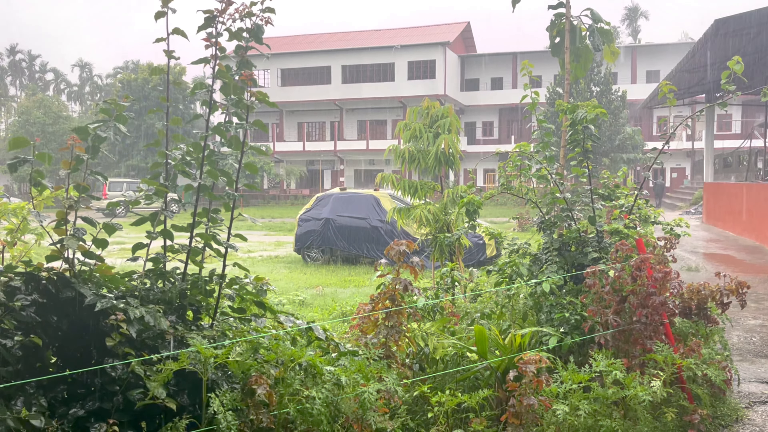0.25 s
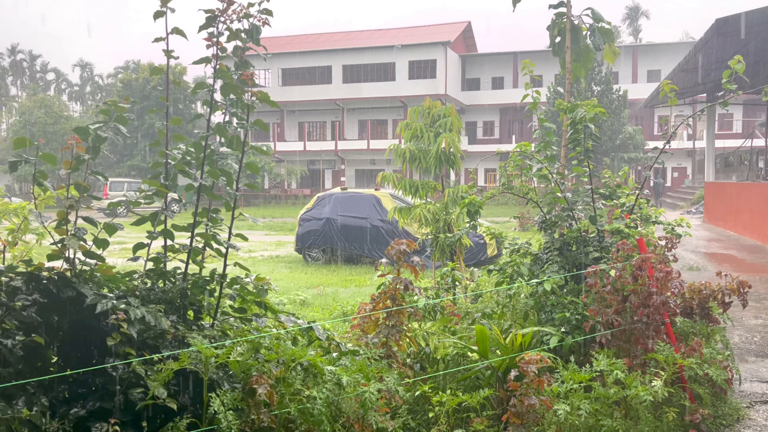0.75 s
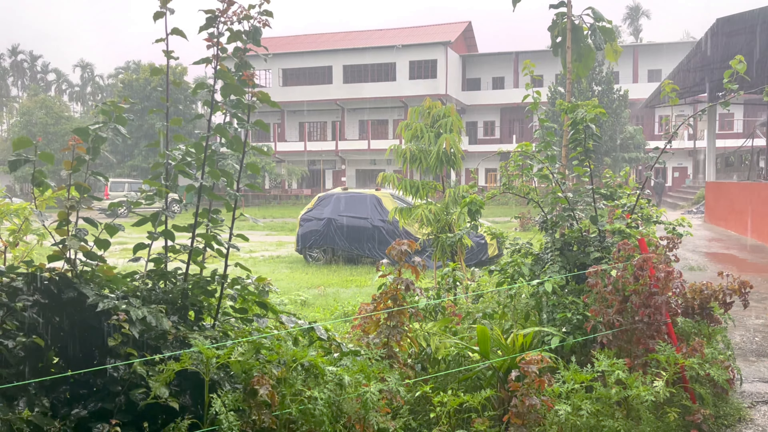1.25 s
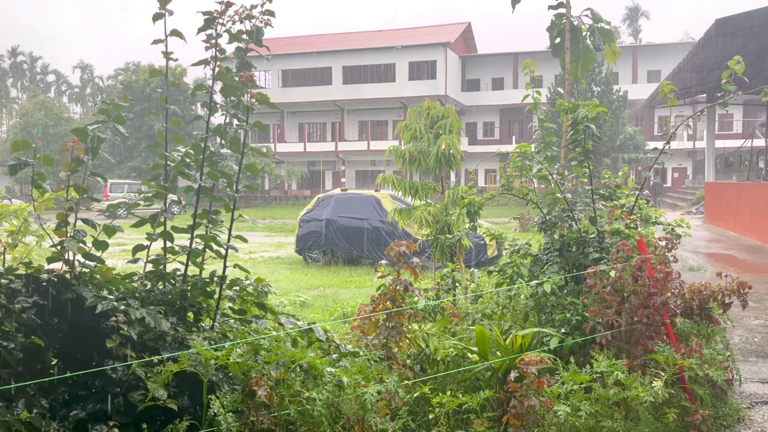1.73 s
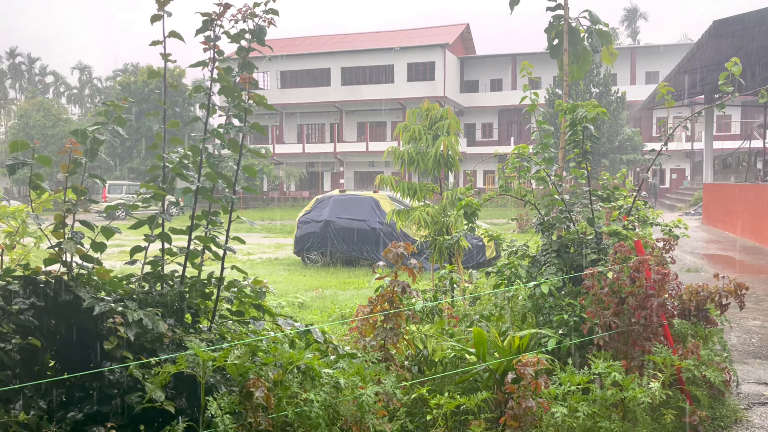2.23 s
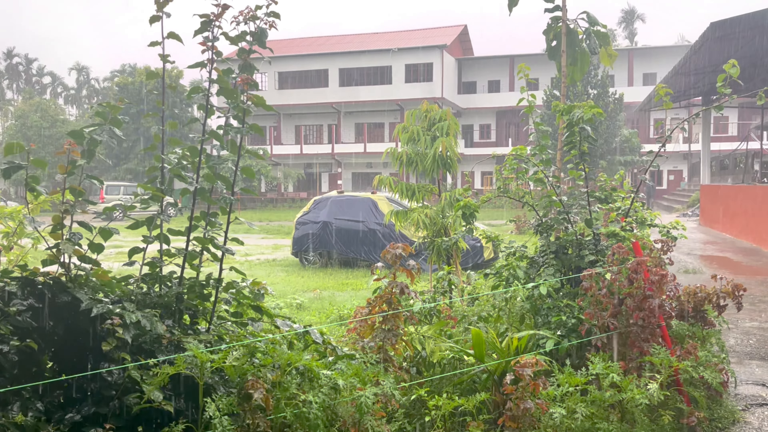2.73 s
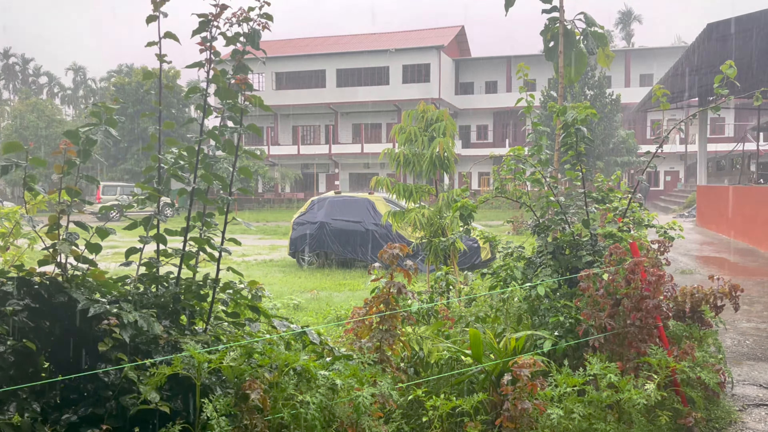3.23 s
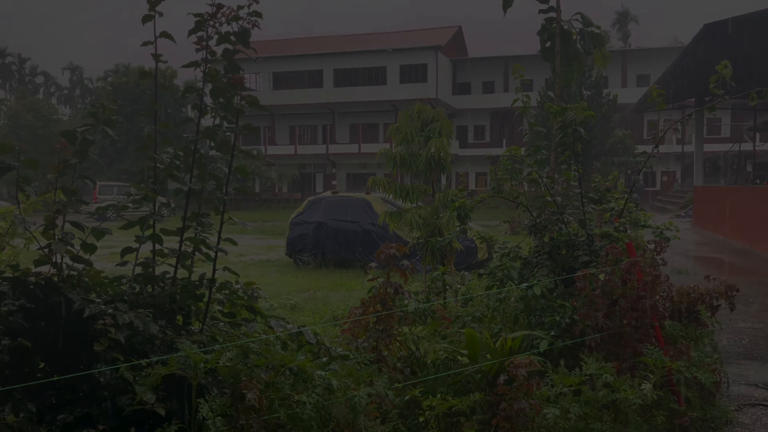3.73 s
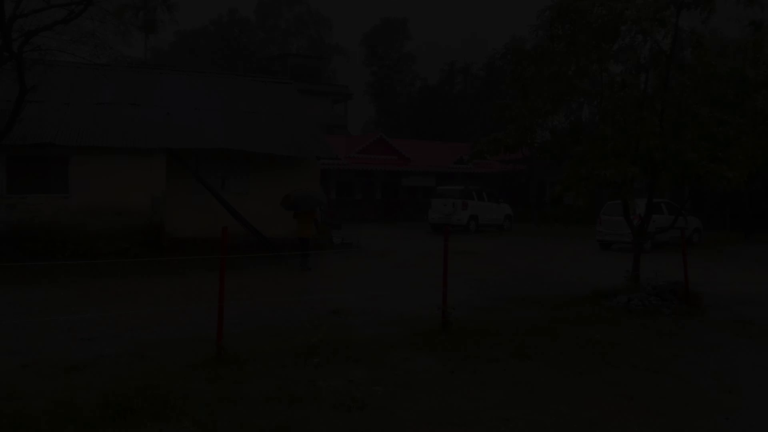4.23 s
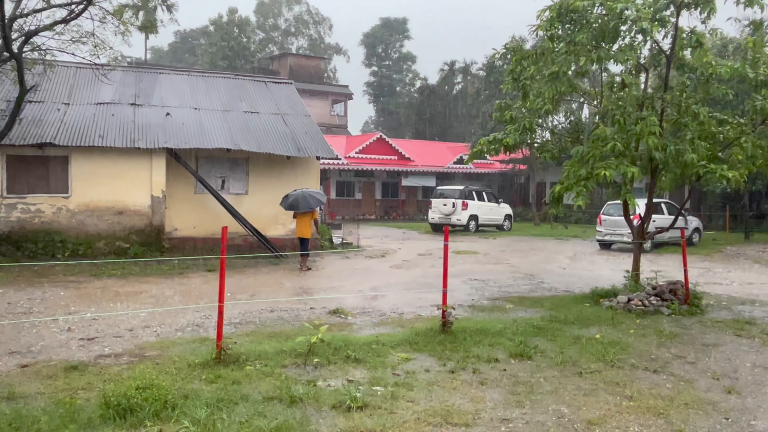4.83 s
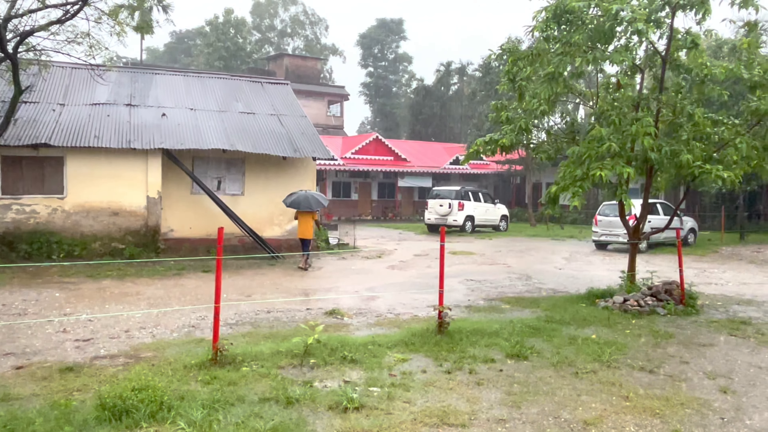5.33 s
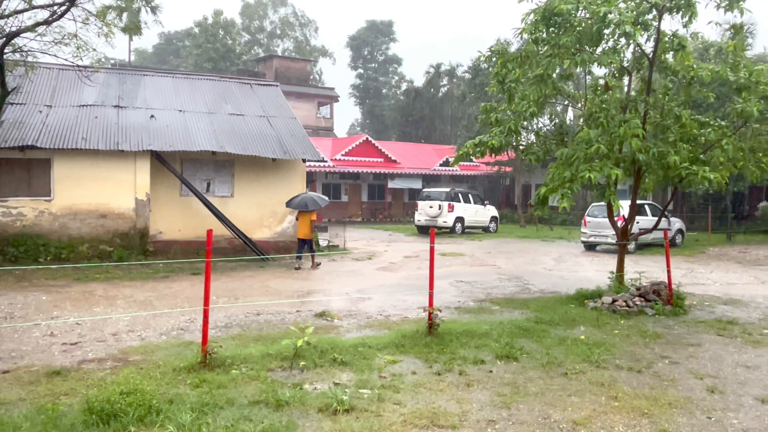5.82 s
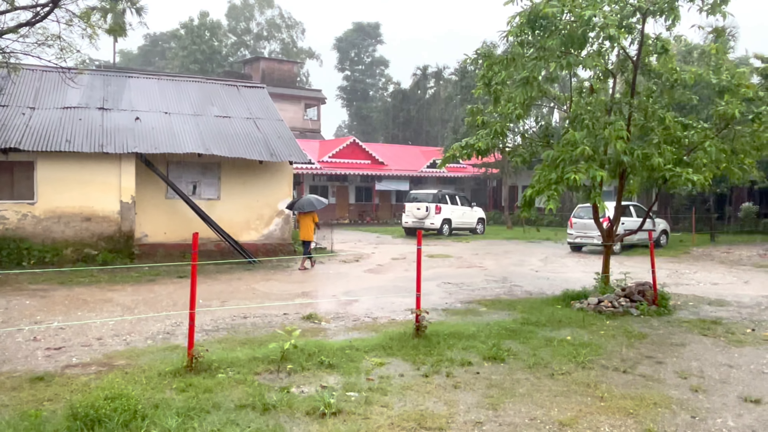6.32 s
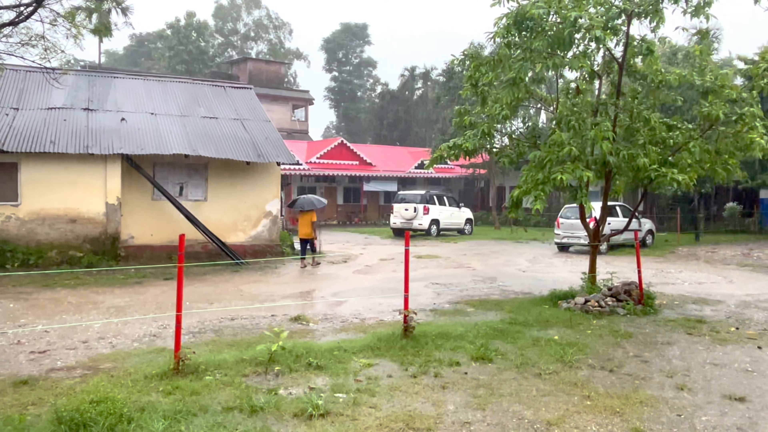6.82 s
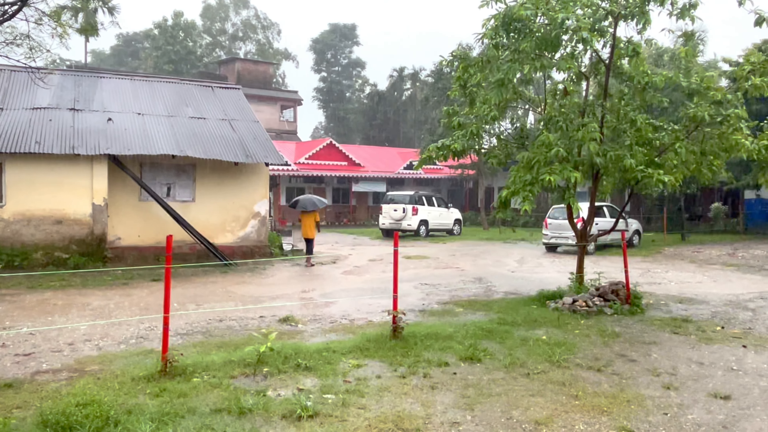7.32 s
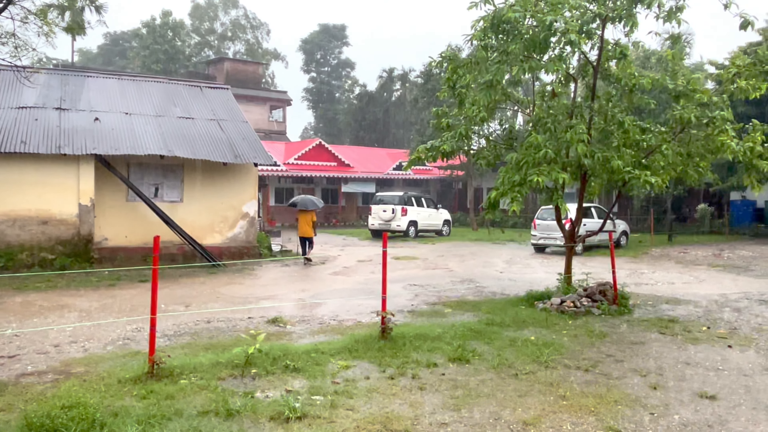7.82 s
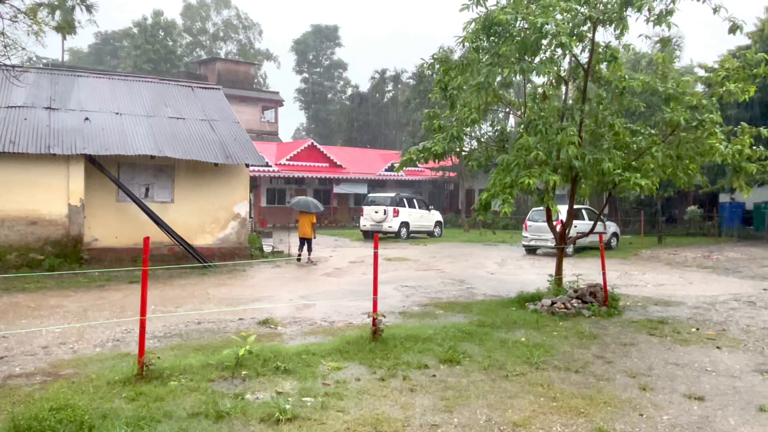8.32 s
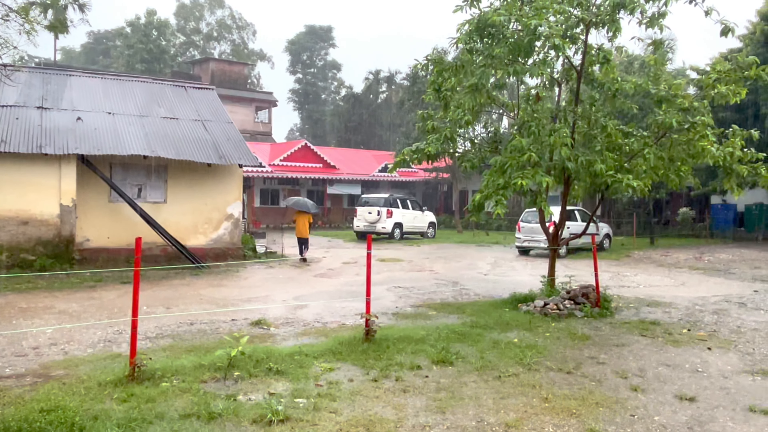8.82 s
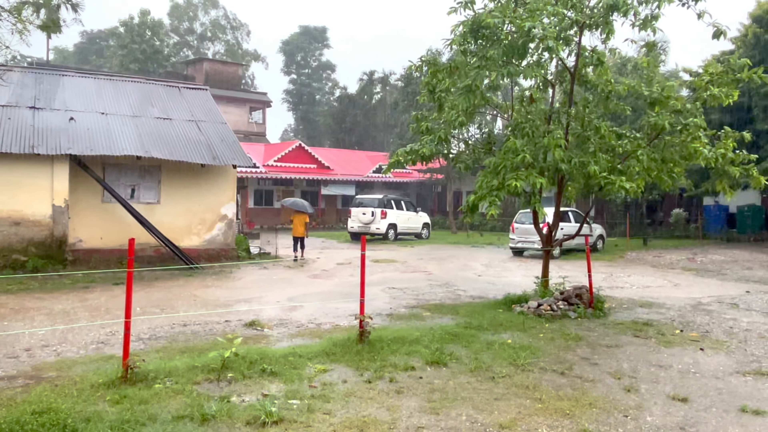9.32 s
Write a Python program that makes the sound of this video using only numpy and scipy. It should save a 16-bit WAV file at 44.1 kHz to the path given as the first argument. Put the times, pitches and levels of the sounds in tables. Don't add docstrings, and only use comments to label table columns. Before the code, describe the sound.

Heavy monsoon rain hisses on leaves with sharp ticks, fades to silence, then abruptly returns as fuller rain with puddle splats and overhead thuds.

```python
import sys
import numpy as np
from scipy import signal
from scipy.fft import rfft, irfft, next_fast_len
from scipy.io import wavfile
from scipy.ndimage import uniform_filter1d

SR = 44100
rng = np.random.default_rng(int(sys.argv[2]) if len(sys.argv) > 2 else 0)


def transcribe(u):
    v = np.clip(np.atleast_2d(u).T, -1, 1)
    q = np.round(v * 32767).astype(np.int16)
    wavfile.write(sys.argv[1], SR, q)


def makeup_ratio(level_db):
    decades = np.asarray(level_db, float) / 20
    return 10 ** decades


N = 421584
CUT_S, FADE_S = 5.1213, 1.99
PORT_DELAY_S = 0.0001723


def evened(x):
    return x / np.sqrt(np.mean(x ** 2) + 1e-20)


def read(points, hz):
    f, value = np.transpose(points)
    return np.interp(np.log(hz + 1), np.log(f + 1), value)


def smooth_noise(shape, sizes):
    noise = rng.standard_normal(shape)
    for size, axis in sizes:
        noise = uniform_filter1d(noise, size=size, axis=axis)
    return evened(noise)


def wash(n, patchy_db, gust_db, flicker_db):
    frames = n // 64 + 8
    real, imag = rng.standard_normal((2, 3, frames, 129))
    patches = smooth_noise((frames, 129), [(40, 0), (4, 1)])
    gusts = smooth_noise(frames, [(50, 0), (30, 0)])
    flicker = smooth_noise((frames, 129), [(5, 0), (60, 1)])
    treble = np.clip(np.fft.rfftfreq(256, 1 / SR) / 3000, .3, 1)
    swell_db = patchy_db * patches + gust_db * gusts[:, None] + flicker_db * flicker * treble
    z = (real + 1j * imag) * makeup_ratio(swell_db)
    return evened(signal.istft(z.transpose(0, 2, 1), nperseg=256, noverlap=192)[1][:, :n])


def blip(hz, cycles, glide, phase, rise):
    turns = np.arange(int(4 * cycles * SR / hz) + 8) * hz / SR
    shape = (1 - np.exp(-turns / rise)) * np.exp(-turns / cycles)
    return shape * np.cos(2 * np.pi * (turns + glide * turns ** 2 / cycles) + phase)


def patter(n, per_s, spread_db, cycles):
    count, bubble_cycles = 14, 9
    chance = per_s / count / SR
    out = np.zeros((3, n))
    for k, hz in enumerate(np.geomspace(120, 15000, count)):
        luck = rng.random((3, n))
        size = makeup_ratio(-spread_db * np.log(np.clip(luck / chance, .04, 1))) * (luck < chance)
        rings = k % 2 == 1 and 900 < hz < 7000
        ring_cycles = (bubble_cycles if rings else cycles) * rng.uniform(0.47, 1.63)
        drop = blip(hz, ring_cycles, .02 if rings else .15, 2 * np.pi * rng.random(), 0.16)
        drop *= np.sqrt(hz) / np.linalg.norm(drop)
        out += signal.oaconvolve(size, drop[None], axes=1)[:, :n]
    return evened(out)


# time in seconds, relative level in dB.
WIND_LEVEL = [(0, -3), (1.5, -6), (2.5, 0), (5.1, -1), (5.2, -12), (6.2, -14), (6.6, -4), (7.6, 7.5),
              (8.7, -3), (9, 7), (9.56, -8)]


def rain(start_s, n, strength, fizz, rumble, colour, ports, drops, far, near):
    size = next_fast_len(n)
    hz = np.fft.rfftfreq(size, 1 / SR)
    near_gain = makeup_ratio(read(drops, hz))
    mixed = rfft(far, size) + near_gain * rfft(near, size)
    both, left, right = mixed * makeup_ratio(read(colour, hz)) / np.sqrt(1 + near_gain ** 2)

    port_hz, pan_db, same, phase = np.transpose(ports)
    link = np.interp(np.log(hz + 1), np.log(port_hz + 1), np.clip(same, 0, 1) * np.exp(1j * phase))
    shared, own = np.sqrt(abs(link)), np.sqrt(1 - abs(link))
    turn = np.exp(1j * (np.angle(link) + 2 * np.pi * hz * PORT_DELAY_S))
    pan = makeup_ratio(read(np.transpose([port_hz, pan_db]), hz) / 2)
    left_port = (shared * both + own * left) * pan
    right_port = (shared * both * turn + own * right) / pan
    pair = np.array([left_port, right_port])

    lowest = 1 / (1 + (hz / 55) ** 6)
    low = 1 / (1 + (hz / 170) ** 4)
    high = 1 / (1 + (2500 / (hz + 1)) ** 4)
    bands = (lowest, low - lowest, 1 - low - high, high)
    wind, rumbling, body, fizzing = (irfft(pair * band, size)[:, :n] for band in bands)

    t = start_s + np.arange(n) / SR
    wind_db = np.interp(t, *np.transpose(WIND_LEVEL))
    rain_db = np.interp(t, *np.transpose(strength))
    fizz_db, rumble_db = (db + slope * (rain_db + 26) for db, slope in (fizz, rumble))
    total = body + makeup_ratio(fizz_db) * fizzing + makeup_ratio(rumble_db) * rumbling + makeup_ratio(wind_db) * wind
    return makeup_ratio(rain_db) * total / body.std()


# time in seconds, level in dB.
BUSH_STRENGTH = [
    (0, -25.5),
    (1.1, -25.5),
    (2, -25),
    (3.1, -24),
    (3.45, -24.5),
    (4.1, -24),
    (5.12, -24.5),
]
# frequency in Hz, level in dB per Hz.
LEAF_SPECTRUM = [(60, -4), (130, -0.5), (200, -2.5), (300, 2), (430, 0), (700, -2.5), (1250, 1),
                 (1610, -0.5), (1760, -7.5), (4300, -12), (5600, -18.5), (7200, -18.5), (10500, -20.5),
                 (15500, -27.5)]
# frequency in Hz, left-right level in dB, likeness from 0 to 1,
# phase of the right beyond the port delay in rad.
BUSH_PORT_PAIR = [(150, .8, .98, 0), (430, -.5, .93, .1), (700, -3.1, .38, -1.3), (1000, -2.3, .38, -2.5),
                  (1550, -2.9, .21, 1.3), (1850, 3.4, .55, -2.2), (2100, 1.5, .62, -2.4),
                  (2500, -.4, .5, 3.1), (3200, .9, .35, 1.6), (4300, 3.4, .5, 1.6), (5600, 2.3, .36, 1.7),
                  (6100, 1.5, .5, 1.1), (6700, .5, .55, .3), (7400, -.3, .62, .7), (8300, 0, .87, .5),
                  (12000, 0, .9, -.3), (15500, 0, .9, -1)]
# frequency in Hz, level against the wash in dB.
BUSH_DROP_SHARE = [(100, -17), (400, -10), (1200, -18), (3000, -15.5), (6000, -3), (12000, -8)]


def bush_rain():
    n = round(CUT_S * SR)
    far = wash(n, patchy_db=1.21, gust_db=0.1, flicker_db=0.8)
    near = patter(n, per_s=1500, spread_db=2.0, cycles=0.88)
    return rain(0, n, BUSH_STRENGTH, (0.94, -0.23), (.5, -.1), LEAF_SPECTRUM, BUSH_PORT_PAIR,
                BUSH_DROP_SHARE, far, near)


# time in seconds,
# level in dB.
YARD_LEVEL = [
    (5.12, -32),
    (5.25, -30.5),
    (5.55, -29.5),
    (6.1, -28),
    (6.9, -27.5),
    (7.3, -26.5),
    (8.0, -26.5),
    (8.6, -25),
    (9.56, -25.5),
]
# frequency in Hz, level in dB per Hz.
YARD_SPECTRUM = [(65, 0), (120, 5), (190, 0.9), (330, 2.5), (700, -2.5), (1250, -0.5), (1600, -2.5),
                 (1900, -7.5), (3000, -12.5), (4300, -13.5), (5600, -20), (6500, -20.5), (7600, -25),
                 (10500, -26), (15500, -32.5)]
# frequency in Hz, left-right level in dB, likeness from 0 to 1,
# phase of the right beyond the port delay in rad.
YARD_PORT_PAIR = [(130, .7, .99, 0), (430, -1.6, .93, .2), (600, -4, .42, .3), (775, -5, .42, -2.2),
                  (1080, -.9, .58, -2.3), (1300, -1.5, .33, -2), (1480, -2.1, .1, 2.8),
                  (1650, -2.5, .2, 2.3), (2000, -4.3, .32, -2.2), (2500, -3.5, .05, 0),
                  (3200, -2.6, .25, 0), (4600, 1.4, .15, 1.7), (5350, 0, .25, -2.6), (6000, -3, .35, 1.2),
                  (6700, -3.6, .45, -.1), (7400, -2.6, .45, 1.3), (8200, -.3, .82, .5),
                  (9600, -1.2, .65, .25), (12000, 0, .85, -.3), (15500, 0, .85, -1)]
# frequency in Hz, level against the wash in dB.
YARD_DROP_SHARE = [(100, -7.5), (400, -7.5), (1200, -14), (3000, -16.5), (6000, -6), (12000, -7.5)]


def yard_rain():
    n = N - round(CUT_S * SR)
    far = wash(n, patchy_db=1.03, gust_db=0.53, flicker_db=1.0)
    near = patter(n, per_s=1100, spread_db=3.5, cycles=0.94)
    return rain(CUT_S, n, YARD_LEVEL, (-.2, -0.4), (0.45, 0.18), YARD_SPECTRUM, YARD_PORT_PAIR,
                YARD_DROP_SHARE, far, near)


def single_drops(rows, cycles, rise, trim_db, splash_db):
    out, lead = np.zeros((2, N + SR)), round(PORT_DELAY_S * SR)
    splash_decay_db = 60 * np.arange(400) / SR / .02
    spray = makeup_ratio(splash_db - splash_decay_db) * rng.standard_normal((len(rows), 400))
    spray[:, 0] = 1
    for (s, db, hz, pan_db), phase, burst in zip(rows, rng.random((len(rows), 1)), spray):
        drop = np.convolve(blip(hz, cycles, 0, 2 * np.pi * phase, rise), burst)
        drop *= makeup_ratio(db + trim_db) / abs(drop).max()
        at = round(s * SR) - np.argmax(abs(drop))
        out[0, at:at + len(drop)] += drop * makeup_ratio(pan_db / 2)
        out[1, at - lead:at - lead + len(drop)] += drop * makeup_ratio(-pan_db / 2)
    return out[:, :N]


def panned(rows, pan_db):
    return [(*row, pan_db) for row in rows]


# peak time in seconds, peak level in dB, pitch in Hz.
RUMBLE_LUMPS = [(0.064, -27, 99.6), (0.944, -26, 172), (1.689, -26, 245), (1.799, -30, 80.7),
                (2.039, -24, 141), (2.405, -25, 248), (2.535, -24, 242), (2.999, -30, 213),
                (3.132, -26, 223), (3.399, -29, 248), (3.599, -35, 248), (5.35, -23, 248),
                (5.649, -25, 96.9), (5.803, -22, 121), (6.062, -22, 248), (6.337, -20, 110),
                (6.836, -26, 218), (7.477, -22, 94.2), (7.799, -23, 118), (8.467, -24, 245),
                (8.578, -21, 129), (8.717, -19, 116), (9.16, -22, 178)]


def shelter_lumps():
    return single_drops(panned(RUMBLE_LUMPS, 0), cycles=2.2, rise=1.2, trim_db=-8.5, splash_db=-43)


# time in seconds, peak level in dB,
# left-right level in dB.
FAINT_TICKS = [(0.4563, -26, -0.5), (1.2978, -25, 0.0), (1.4715, -31, -0.5), (2.167, -27, -1.0),
               (2.5899, -26, -0.5), (3.1317, -26, 0.0), (3.6715, -27, 0.0), (4.0561, -32, -0.5),
               (5.1232, -41, 0.0), (5.2568, -35, 0.0), (5.9039, -33, -0.5), (6.4546, -34, -0.5),
               (6.5953, -36, 0.0), (7.0318, -33, 0.0), (7.0982, -29, 0.0), (8.4745, -34, -0.5),
               (8.5728, -30, -0.5), (9.0288, -32, -0.5)]


def specks():
    rows = [(s + .002, db, 11500, pan_db) for s, db, pan_db in FAINT_TICKS]
    return single_drops(rows, cycles=1.1, rise=.3, trim_db=5, splash_db=-25)


# peak time in seconds, peak level in dB, pitch in Hz.
EAVES_DRIPS = [
    (0.028, -14.5, 440),
    (1.373, -18, 410),
]


def eaves_drips():
    return single_drops(panned(EAVES_DRIPS, -1.5), cycles=1.3, rise=.6, trim_db=-6, splash_db=-36)


# peak time in seconds, peak level in dB, pitch in Hz.
PUDDLE_SPLATS = [(5.249, -19.5, 300), (5.314, -19, 570), (5.347, -21, 339), (5.402, -24, 826),
                 (5.449, -23, 320), (5.925, -17, 511), (6.001, -17, 436), (6.022, -18, 413),
                 (6.171, -16, 453), (6.218, -22, 598), (6.686, -19, 410), (6.821, -28, 1220),
                 (7.282, -17, 430), (7.413, -16, 1150), (7.605, -19, 409), (7.7, -16.5, 368),
                 (7.816, -14, 367), (8.114, -22, 345), (8.21, -12.5, 409), (8.533, -20, 304),
                 (8.661, -20, 641), (8.909, -13, 1060), (9.164, -14, 479), (9.279, -20, 371)]


def puddle_splats():
    return single_drops(panned(PUDDLE_SPLATS, -4.5), cycles=1.6, rise=.6, trim_db=-5, splash_db=-36)


# peak time in seconds, peak level in dB, pitch in Hz.
OVERHEAD_THUDS = [
    (0.6978, -14, 210),
    (4.193, -10, 150),
    (6.576, -20, 170),
    (7.103, -7, 129),
    (7.1946, -27, 163),
    (7.6502, -14, 179),
    (8.201, -10.5, 128),
    (8.8276, -4, 109),
    (9.0184, -9, 119),
]


def shelter_thuds():
    return single_drops(panned(OVERHEAD_THUDS, 0), cycles=2.7, rise=1.5, trim_db=-14.5, splash_db=-48.5)


# peak time in seconds, peak level in dB, pitch in Hz.
GROUND_PATS = [(1.9525, -11, 1400), (2.1788, -9, 1700), (3.3806, -18, 1400), (3.783, -8, 1300),
               (5.3562, -19, 540), (5.561, -19, 1000), (5.859, -10, 1200), (5.953, -13, 770),
               (6.4263, -13, 810), (6.619, -12, 1100), (6.8863, -12, 1200), (7.2845, -11, 1200),
               (7.8186, -10, 930), (7.8337, -11, 830), (7.78, -10, 1450), (9.1, -10, 1110),
               (8.044, -12, 1300), (8.058, -13, 1200), (8.213, -10, 1200), (8.6901, -14, 1300),
               (8.8586, -13, 565), (9.2361, -10, 1400), (9.4178, -9, 1300), (9.4825, -11, 1400),
               (9.5359, -11, 1400)]


def ground_pats():
    return single_drops(panned(GROUND_PATS, -4.5), cycles=1.05, rise=0.42, trim_db=-4.0, splash_db=-36)


def small_ticks(from_s, to_s, peak_db, spread_db, side_db, count):
    low_hz, high_hz = 5000, 12500
    when, size, pitch, lean = rng.random((count, 4)).T
    s = from_s + (np.arange(count) + when) / count * (to_s - from_s)
    hz = low_hz * (high_hz / low_hz) ** pitch
    pan_db = side_db * (1 - pitch) + 4 * (lean - .5)
    return list(zip(s, peak_db - spread_db * size, hz, pan_db))


# peak time in seconds, peak level in dB, pitch in Hz,
# left-right level in dB.
SHARP_TICKS = [(0.1702, -13, 4300, 2), (0.5278, -11, 9000, 1), (0.7097, -15.5, 4200, 12),
               (0.8987, -17, 6300, 4), (1.1557, -18, 10000, -1), (1.3204, -17, 5400, 6),
               (1.9288, -15, 4770, 7), (2.0448, -17, 5500, 6), (2.2558, -10, 6800, 6),
               (2.5395, -16, 5500, 3), (2.5934, -15, 4300, 4), (2.9081, -14, 8000, 0),
               (3.0321, -14, 7800, 1), (3.3866, -14, 11500, 0), (3.4112, -12, 7000, 4),
               (3.7498, -17, 6000, 5), (4.3655, -16, 7600, 2), (4.5387, -12.5, 6300, 6),
               (4.6666, -20, 6000, 6), (4.7021, -16, 8900, 0), (4.8843, -13, 8000, 1),
               (5.8031, -24, 6200, -10), (5.9998, -21, 10500, 3), (6.9393, -21, 6800, 7),
               (7.2193, -23, 8800, -2), (7.7606, -21, 6500, 9), (7.8243, -16, 12500, 0),
               (7.8816, -21, 9900, 5), (8.785, -20, 10000, -2), (9.248, -21, 9000, 0)]
# peak time in seconds, peak level in dB, pitch in Hz, left-right level in
# dB.
WIDE_SNAPS = [(.5283, -15, 4700, 1), (.5276, -14, 13500, 0), (.7137, -20, 5400, 4), (1.3204, -24, 9000, 1),
              (2.2561, -24, 11000, 0), (2.308, -18, 13500, 0), (2.5934, -21, 13000, -1),
              (3.3868, -18, 14000, 0), (4.5391, -10, 4600, 8), (4.5385, -22, 11500, 0),
              (5.1226, -34, 13500, 0), (5.1232, -25, 3200, -2), (5.5, -24, 4200, 4), (7.7609, -25, 4200, 7),
              (7.8246, -24, 9500, 2), (7.8241, -17, 14200, 0), (9.2482, -23, 13500, 0),
              (9.2484, -22, 6200, 5), (7.2195, -27, 13000, -2), (2.9083, -24, 12500, 0)]


def ticks():
    small = small_ticks(.02, 5.8, peak_db=-20.5, spread_db=7, side_db=6.0, count=18)
    small += small_ticks(5.6, 10.0, peak_db=-29, spread_db=5.5, side_db=-5, count=8)
    rows = SHARP_TICKS + WIDE_SNAPS + small
    return single_drops(rows, cycles=1.1, rise=.3, trim_db=-1, splash_db=-25)


def scene():
    downpour = np.concatenate([bush_rain(), yard_rain()], axis=1)
    low_drops = shelter_lumps() + shelter_thuds() + eaves_drips() + puddle_splats()
    return downpour + low_drops + specks() + ground_pats() + ticks()


# from in Hz, to in Hz, gain in dB.
WEAK_MID_BANDS = [
    (8250, 8950, -1),
    (8950, 9600, -1.5),
    (14500, 15100, -1),
    (15100, 22050, -8),
]
# from in Hz, to in Hz, gain in dB.
WEAK_SIDE_BANDS = [
    (11050, 11600, -5),
    (11600, 12450, -7),
    (12450, 13050, -5),
]


def weak_bands(hz):
    mid_db = sum(db * ((hz > a) & (hz < b)) for a, b, db in WEAK_MID_BANDS)
    side_db = sum(db * ((hz > a) & (hz < b)) for a, b, db in WEAK_SIDE_BANDS)
    return makeup_ratio([mid_db, side_db])


def roll_off(x):
    return signal.sosfilt(signal.butter(12, 15800, fs=SR, output="sos"), x)


def record(dry):
    size = next_fast_len(N)
    hz = np.fft.rfftfreq(size, 1 / SR)
    low_cut = 1 / np.sqrt(1 + (48 / (hz + 1)) ** 8)
    mid_side = rfft([dry[0] + dry[1], dry[0] - dry[1]], size) * low_cut / 2
    mid, side = irfft(mid_side * weak_bands(hz), size)[:, :N]
    t = np.arange(N) / SR
    fade_out = np.clip((CUT_S - t) / FADE_S, 0, 1)
    fade_in = np.clip((t - CUT_S) / 0.002, 0, 1)
    fade = np.where(t < CUT_S, fade_out, fade_in)
    return roll_off(np.array([mid + side, mid - side]) * fade)


dry = scene()
out = record(dry)
transcribe(out)
```